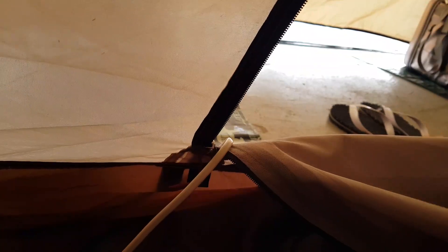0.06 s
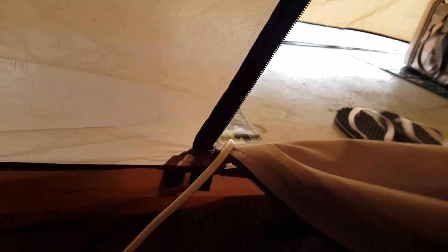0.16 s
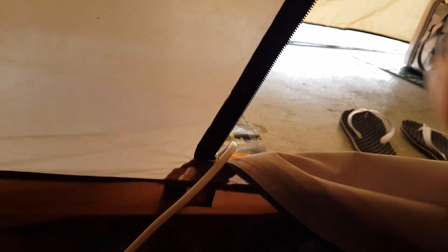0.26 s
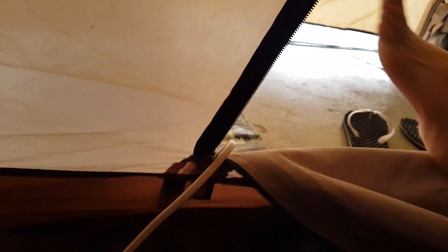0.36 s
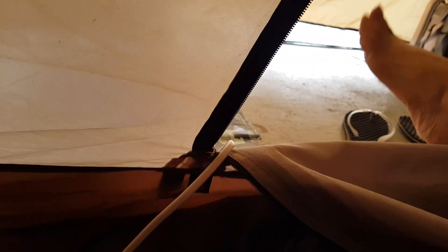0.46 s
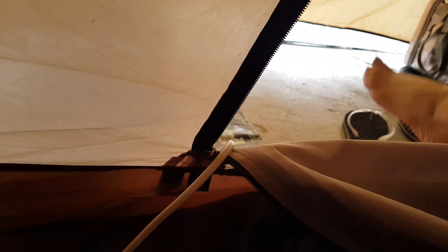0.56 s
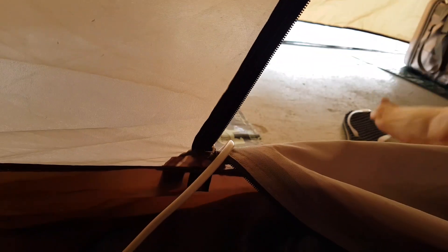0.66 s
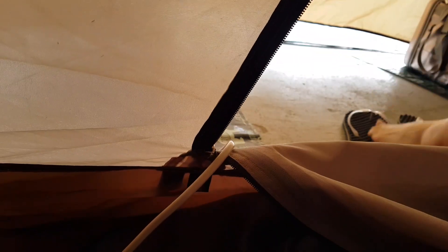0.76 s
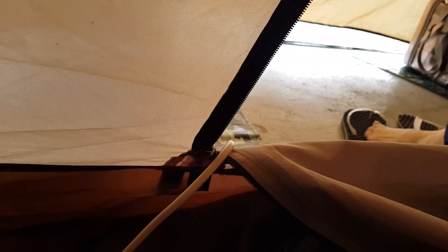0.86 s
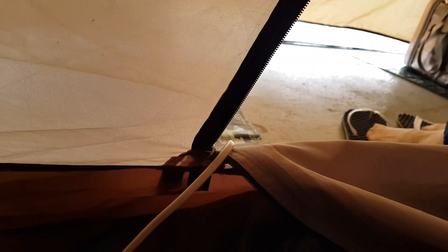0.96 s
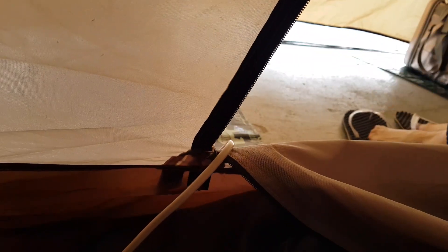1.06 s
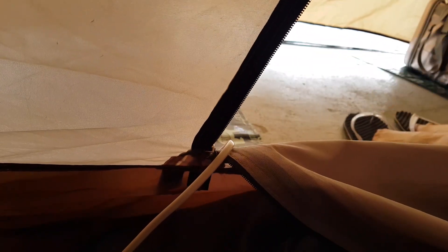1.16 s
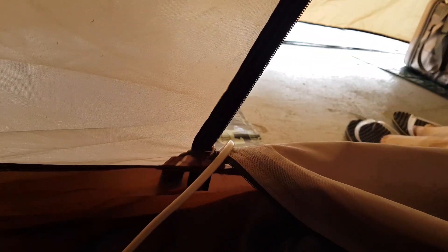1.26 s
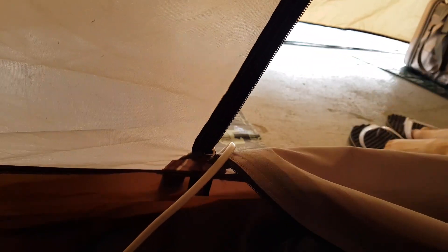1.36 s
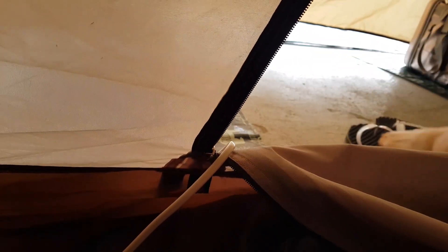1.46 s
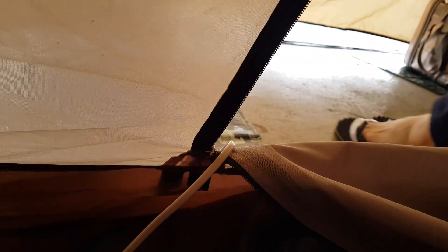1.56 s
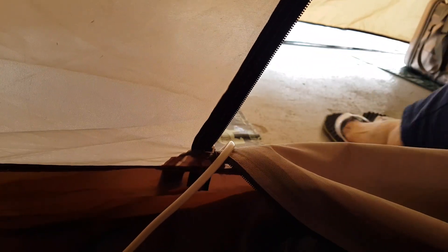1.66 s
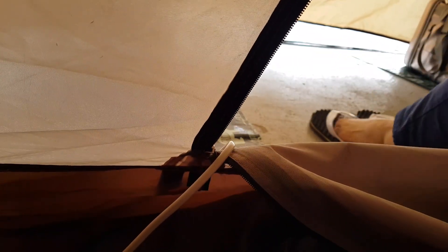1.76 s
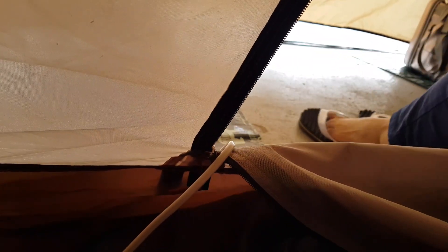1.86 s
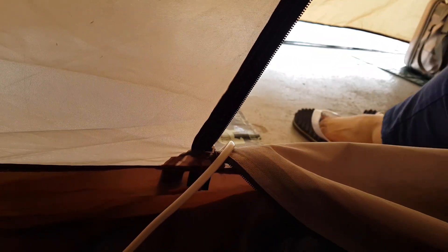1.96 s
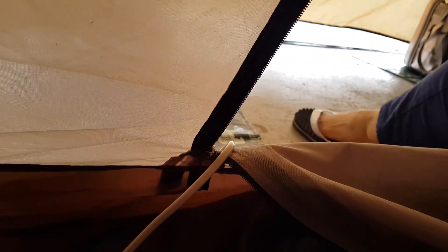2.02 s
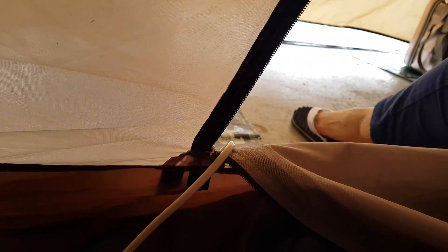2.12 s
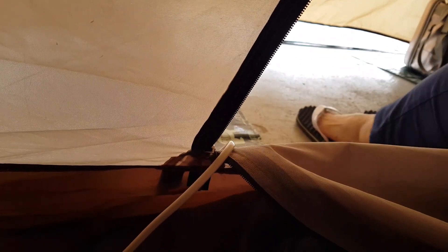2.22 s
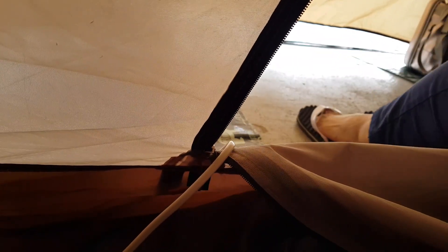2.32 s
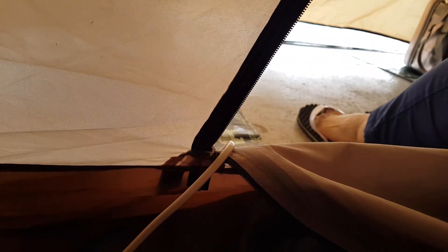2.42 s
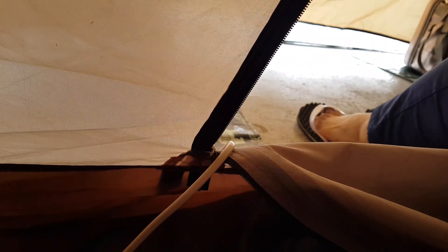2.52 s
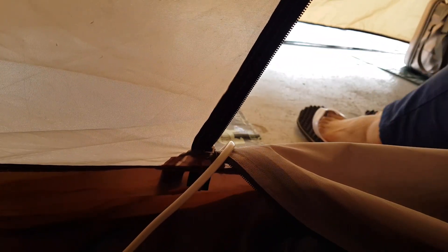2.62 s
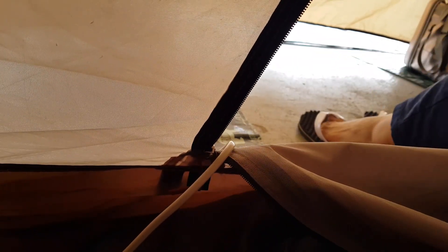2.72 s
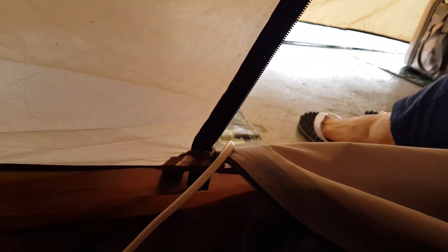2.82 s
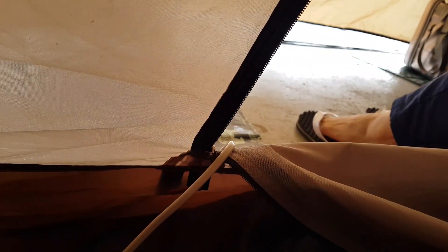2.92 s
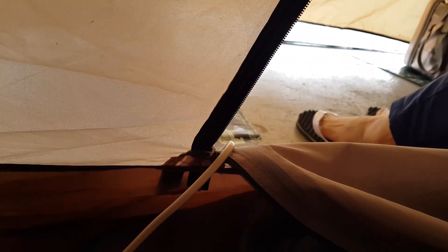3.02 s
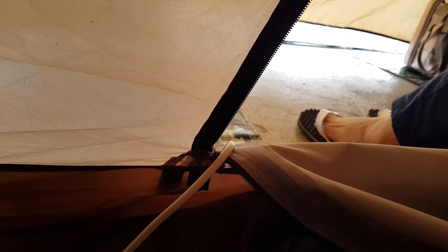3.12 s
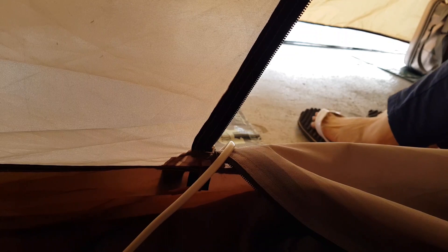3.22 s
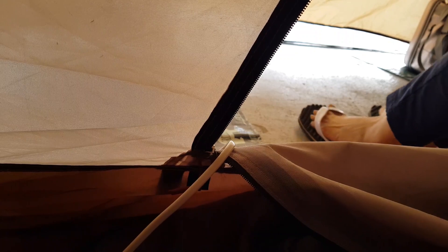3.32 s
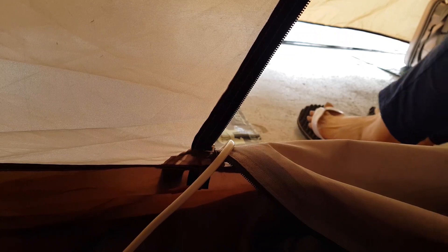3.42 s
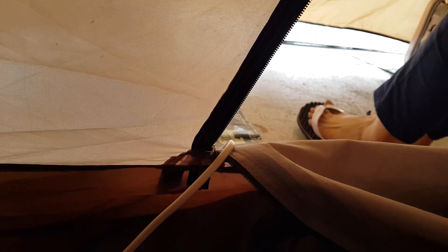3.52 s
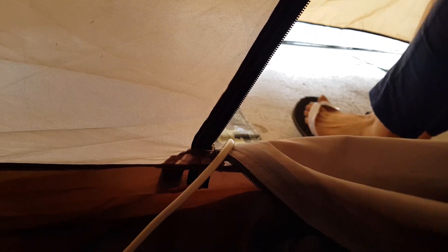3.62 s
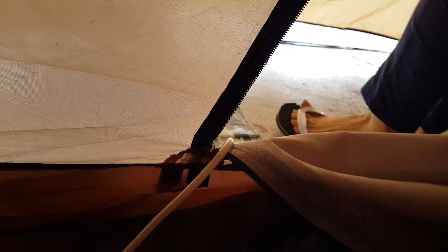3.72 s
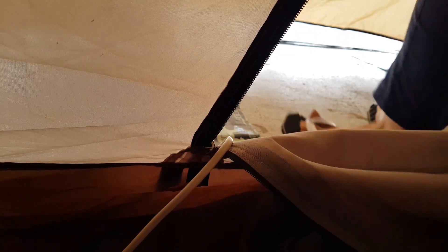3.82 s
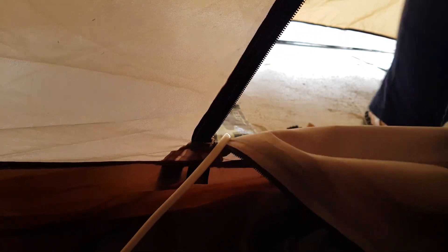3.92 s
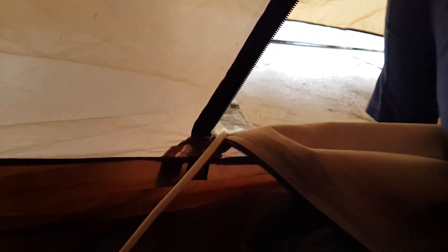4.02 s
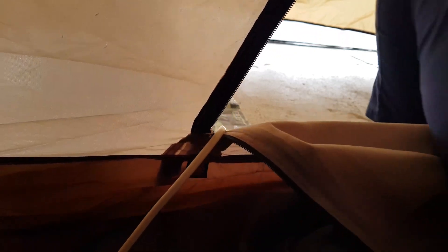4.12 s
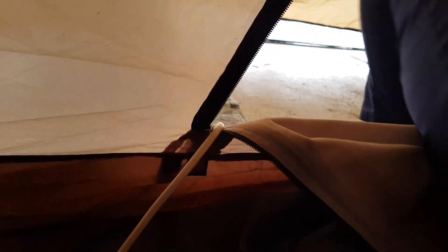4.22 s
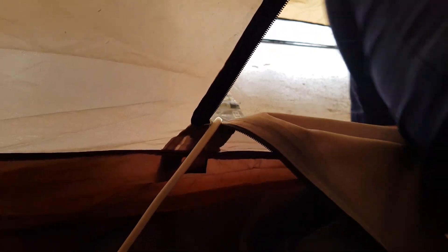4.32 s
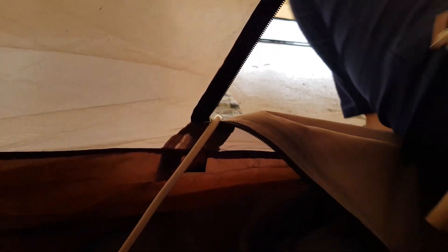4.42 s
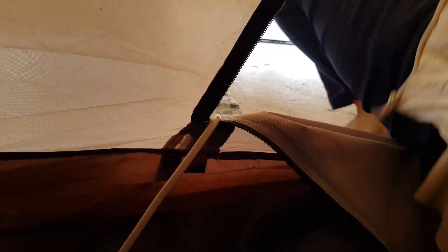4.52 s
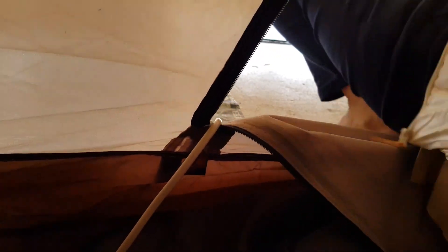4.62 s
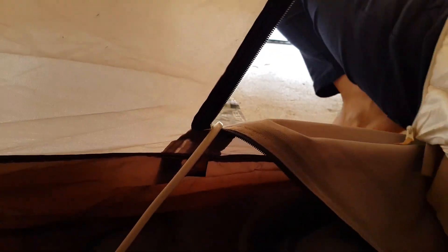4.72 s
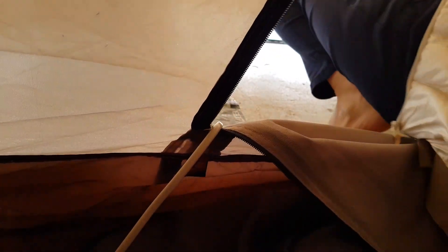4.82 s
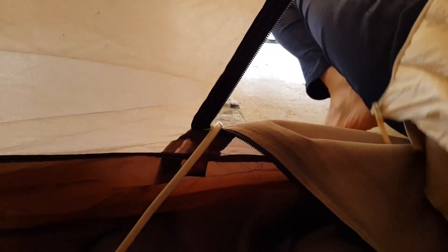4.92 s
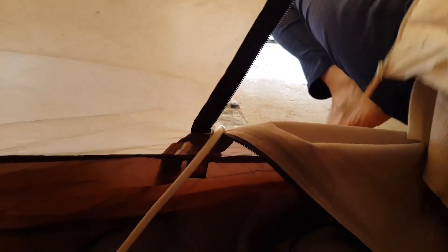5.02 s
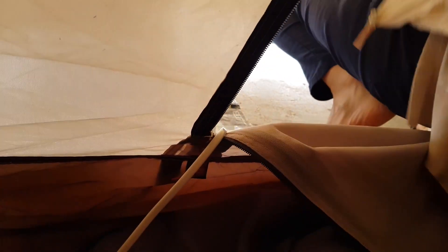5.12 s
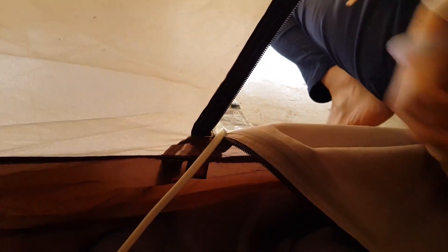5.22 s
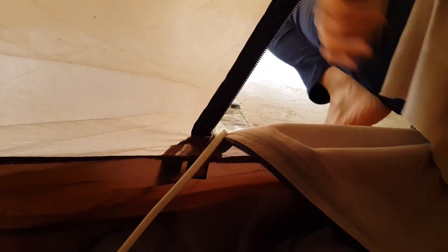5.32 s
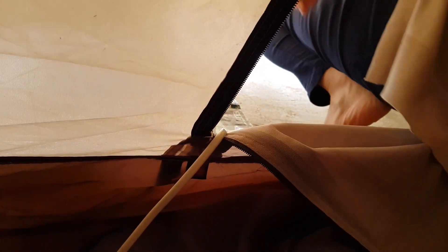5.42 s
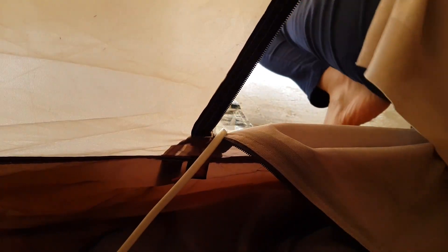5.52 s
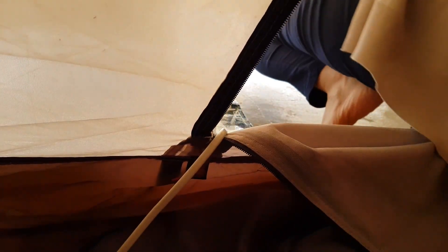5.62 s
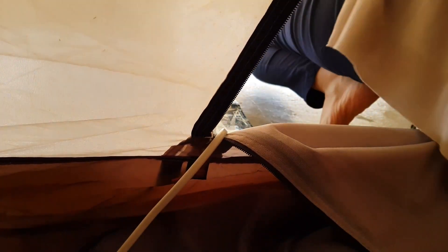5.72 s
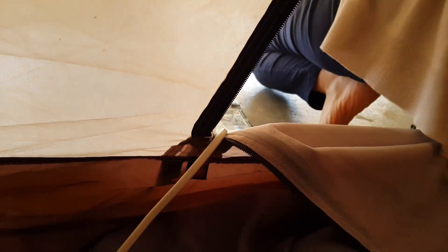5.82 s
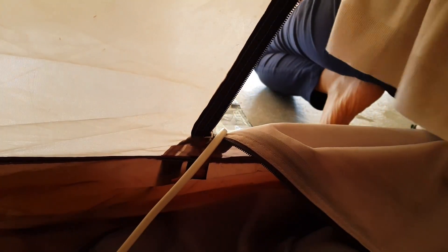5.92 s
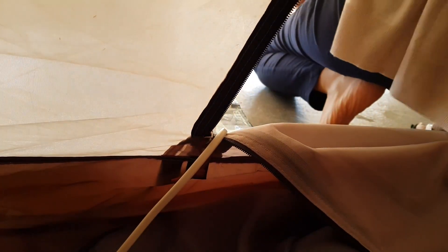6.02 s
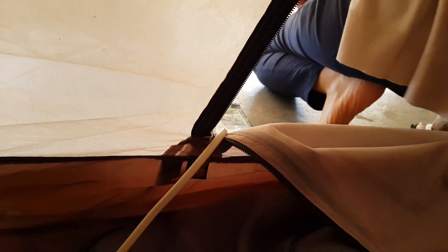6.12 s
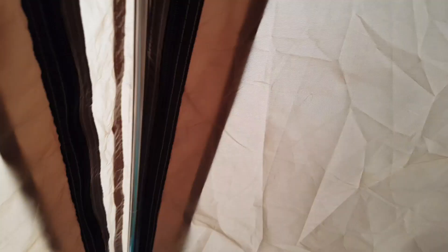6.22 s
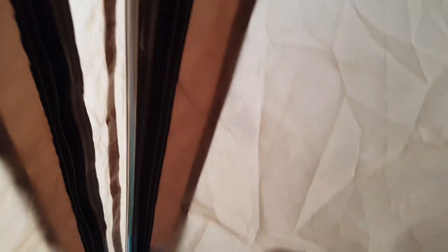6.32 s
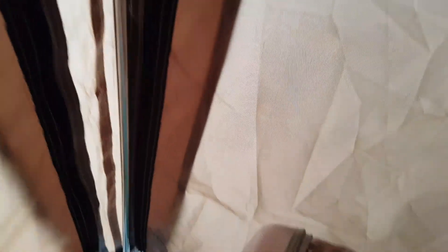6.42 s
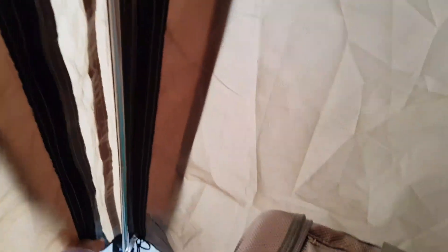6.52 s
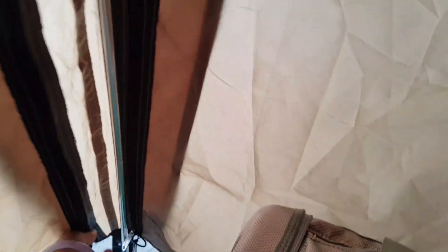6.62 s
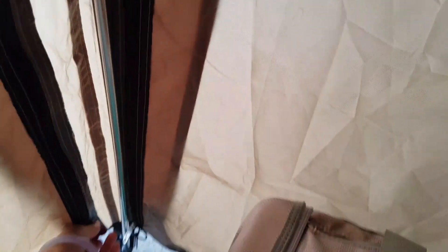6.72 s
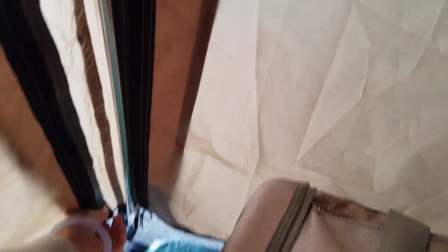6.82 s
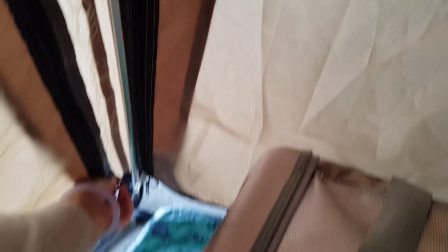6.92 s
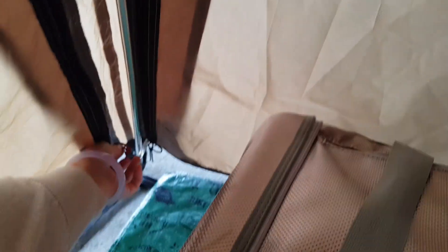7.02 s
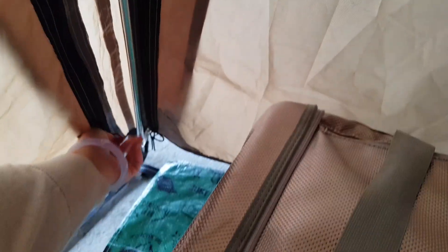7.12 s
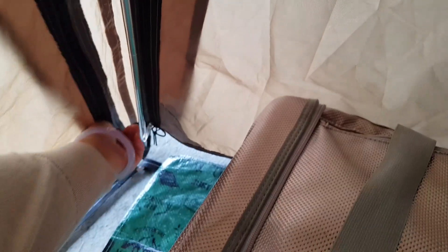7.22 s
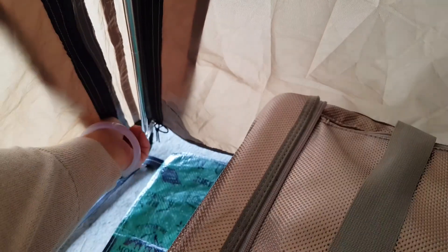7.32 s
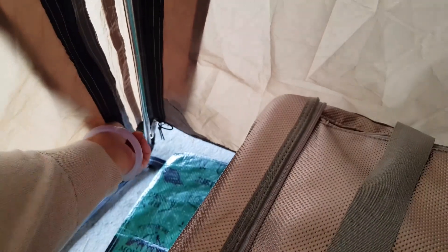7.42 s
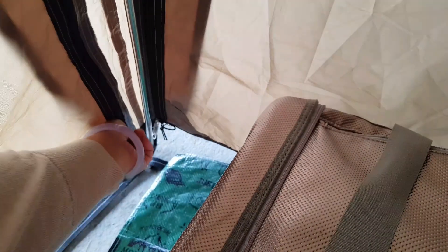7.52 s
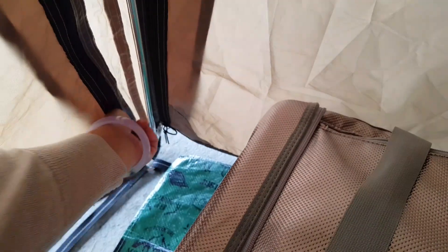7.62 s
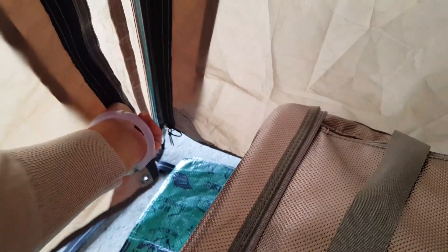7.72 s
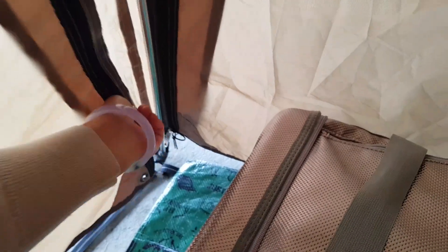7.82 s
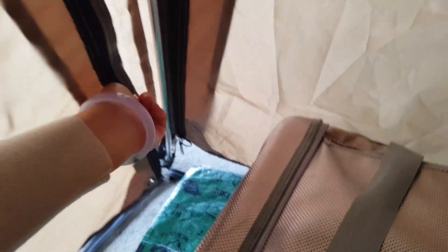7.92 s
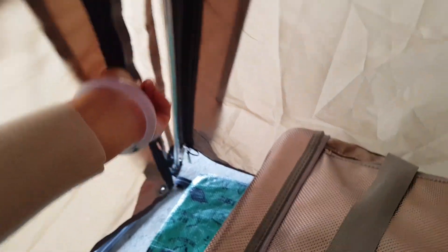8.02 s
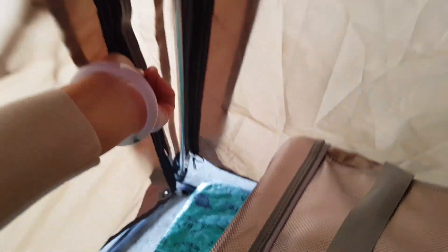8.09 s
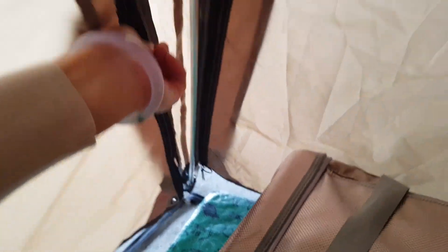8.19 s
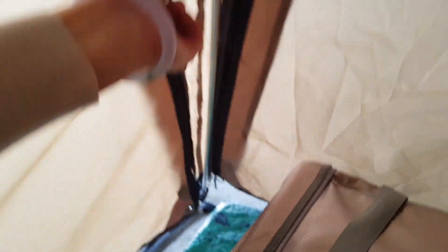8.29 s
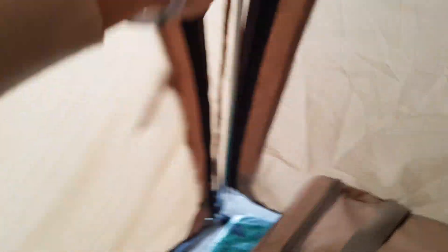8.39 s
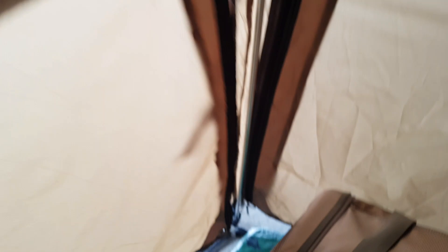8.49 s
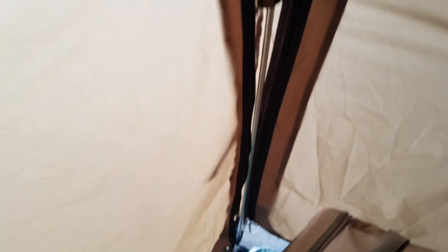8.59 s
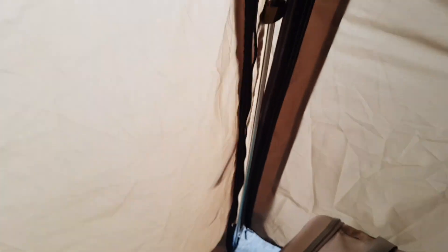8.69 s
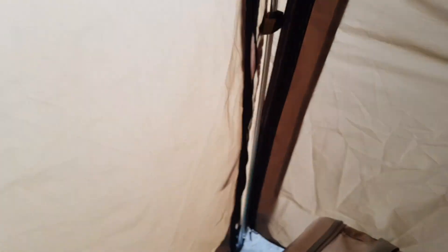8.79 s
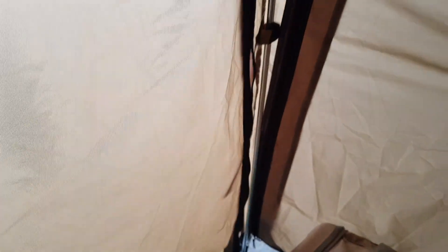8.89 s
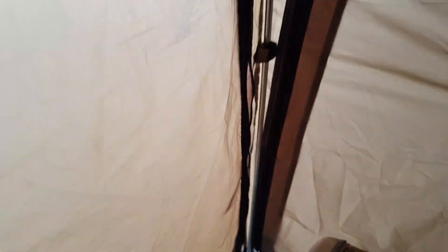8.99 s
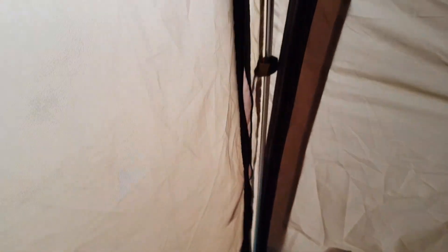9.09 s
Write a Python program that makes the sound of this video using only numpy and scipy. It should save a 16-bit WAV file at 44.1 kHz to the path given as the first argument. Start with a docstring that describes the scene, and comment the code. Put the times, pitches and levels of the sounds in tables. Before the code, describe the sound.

Inside a small tent, nylon rustles and slippers scuff as someone shifts about, then after a quiet pause a long rising zip pull rasps.

```python
"""A tent door zip is pulled in one stroke: teeth sing at their passing rate, friction rasps and hisses, snags burst.
Before it, inside the small tent, someone shuffles into slippers, crouches and rustles the nylon.
Cloth is grainy shaped noise in swells, with crisp flicks and brief pitched rings of filtered noise;
feet, knees and fingers knock on ringing ground modes. A low outdoor rumble and faint hiss lie under everything."""
import sys
import numpy as np
from scipy import signal
from scipy.fft import rfft, irfft, next_fast_len
from scipy.io import wavfile
from scipy.ndimage import uniform_filter1d

SR = 44100
rng = np.random.default_rng(int(sys.argv[2]) if len(sys.argv) > 2 else 0)


def put_to_file(sound):
    """Save the sound as 16-bit audio at rate SR, in the file named by the first command-line argument."""
    columns = np.atleast_2d(sound).T  # one column per channel
    safe = np.clip(columns, -1, 1)
    whole_steps = np.round(safe * 32767)
    wavfile.write(sys.argv[1], SR, whole_steps.astype(np.int16))


N = 403515   # length in samples

# Course of the zip pull; rasp_db follows the hand's pressure, whine_db is over the rasp, the last two trim its multiples:
# time_s, rate_teeth_per_s, rasp_db, whine_db, second_multiple_db, third_and_higher_db
ZIP_PULL = [(7.64, 124, -73, -4, 0, -3), (7.70, 135, -52, -7.5, -3, -11.5), (7.78, 181, -43, -9.5, 3.5, 2),
            (7.86, 208, -41.5, -5, 1.5, -9.5), (7.96, 274, -42, -0.5, -1.5, -1),
            (8.03, 292, -44, 3, -9, -0.5), (8.086, 362, -39.5, -6, 2, 0), (8.19, 415, -38, -1, -7.5, -4.5),
            (8.27, 445, -38.5, -5, 2, 8), (8.32, 500, -39.5, 6.5, -5, -3), (8.365, 572, -41.5, 0.5, 5, 2.5),
            (8.393, 587, -39.5, 4.5, -9, -4.5), (8.412, 590, -40.5, -5, 5.5, 8),
            (8.427, 625, -39.5, -8, 2, 4), (8.46, 665, -41, -0.5, 12.5, 4), (8.51, 696, -39, 4, -7, -0.5),
            (8.586, 778, -38.5, 3.5, -6.5, 0.5), (8.625, 770, -35, -1.5, 7.5, -5),
            (8.70, 785, -38.5, -1, 0.5, -3), (8.72, 755, -37.5, -1.5, 0, 0),
            (8.755, 640, -40.5, -9.5, 14.5, 4.5), (8.79, 585, -40, 2, 7.5, -7),
            (8.83, 512, -41, 2.5, -1.5, -10), (8.9, 468, -41.5, -2.5, 0.5, -1), (8.93, 505, -41, 0, 1, -2),
            (8.985, 465, -41.5, 0.5, -5, -18), (9.02, 382, -41.5, -5, -2.5, 6),
            (9.055, 370, -39, -17, 11, 13.5), (9.072, 422, -43, -0.5, -0.5, -2),
            (9.15, 365, -44.5, 7.5, -7, -5)]
# Where the slider catches and slows: time_s, burst_db, length_s, highest_hz, speed_lost_share
ZIP_SNAGS = [(8.195, -37.5, 0.049, 440, 0.013), (8.4, -43, .048, 1700, 0.35),
             (8.648, -41.5, .036, 713.5, .14), (8.739, -41, 0.061, 407, .011),
             (8.864, -40.5, 0.05, 748, .16), (8.965, -46, .034, 748, .15), (9.107, -38.5, .05, 1110, 0.17)]
# Resonances of the zip tape: pitch_hz, width_hz, level_db
TAPE_MODES = [(390, 200, 2), (824, 165, 3.5), (1000, 190, 3), (1485, 216, 5.5), (2080, 480, 0),
              (3850, 8100, -19.5)]
# What the tape radiates of the tooth rate and its multiples: pitch_hz, level_db (over the rasp)
WHINE_RADIATION = [(120, 5), (210, -5), (290, -2.5), (400, 0), (580, -2.5), (790, 3), (1130, 1),
                   (1500, 0.5), (1750, -3.5), (2050, 3.5), (2600, -2), (3800, -3.5), (6000, -7)]
# Strength of the tooth rate and its next four multiples: level_db
FIRST_MULTIPLES_DB = [2.5, -1, -0.5, -6.5, -4.5]
# Spectrum of the slider's hiss: pitch_hz, level_db
ZIP_HISS = [(1290, -5), (2200, -17), (2470, 2), (3400, -2), (3900, 2.5), (6650, -10.5), (11200, -0.5),
            (15600, -9)]
# How the two microphones hear the zip: pitch_hz, likeness_0_to_1, right_leads_rad, left_minus_right_db
ZIP_STEREO = [(110, 0.96, 0, -1), (500, 0.95, 0.07, 0), (706, 1, 0.53, -3), (1000, 0.87, 0.85, -2),
              (1400, 0.82, -1.4, -5), (1840, 0.65, -1.4, -6.5), (2400, .4, -2.5, -1.5),
              (3350, 0.17, -2.5, 0.5), (7700, .05, -3.5, -2.5), (12000, .15, -4.5, 1.7)]

# Strokes of cloth and soles on the groundsheet, rise and fall over 20 dB: peak_s, rubbing_db, rise_s, fall_s
CLOTH_STROKES = [(.19, -38, 0.087, 0.11), (.33, -36.5, 0.31, 0.25), (.552, -46.5, 0.06, 0.22),
                 (.76, -53.5, 0.25, 0.15), (1.011, -50, 0.059, 0.089), (1.075, -47, 0.028, 0.04),
                 (1.221, -40.5, 0.052, 0.09), (1.36, -45, 0.33, 0.58), (1.52, -38, 0.4, 0.29),
                 (1.891, -41.5, 0.21, 0.13), (2.05, -43, 0.1, 0.14), (2.31, -53, 0.27, 0.085),
                 (2.439, -51.5, 0.43, 0.11), (2.56, -51.5, 0.065, 0.14), (2.76, -44, 0.2, 0.23),
                 (2.88, -49.5, 0.2, 0.072), (3.05, -48.5, 0.098, 0.32), (3.2, -47, 0.4, 0.31),
                 (3.6, -54.5, 0.39, 0.74), (3.85, -50.5, 0.33, 0.81), (4.02, -37.5, 0.1, 0.14),
                 (4.147, -37.5, 0.036, 0.25), (4.289, -37, 0.049, 0.038), (4.5, -52, 0.42, 1),
                 (5.15, -54.5, 0.19, 0.27), (5.48, -59.5, 0.95, 0.95), (5.881, -57.5, 0.067, 0.23),
                 (6.04, -59, 0.22, 0.16), (6.51, -59.5, 0.066, 0.36), (6.8, -63, 0.78, 0.34),
                 (7.33, -68.5, 0.3, 1)]
# Heavier scuffs, rise and fall over 20 dB: peak_s, dull_db, hollow_db, rise_s, fall_s
SCUFFS = [(0.05, -53, -55, 0.028, 0.11), (.3, -53.5, -50.5, 0.22, 0.27), (.39, -50.5, -50.5, 0.18, 0.24),
          (1.022, -60.5, -57, 0.062, 0.061), (1.52, -53, -48, 0.13, 0.32), (1.78, -59.5, -52, 0.84, 0.57),
          (2.06, -84, -68, 0.08, 0.079), (2.4, -65.5, -75, 0.08, 0.3), (2.865, -63, -72, 0.041, 0.03),
          (3.17, -62, -57.5, 0.18, 0.44), (3.55, -59, -62, 0.081, .3), (3.62, -54, -66, 0.062, 0.089),
          (3.88, -66, -62.5, 0.62, 0.41), (4.033, -36, -39, 0.052, 0.096), (4.27, -54, -49.5, 0.11, 0.075),
          (4.48, -61, -59, 0.5, 0.45), (5.17, -57.5, -59.5, 0.16, 0.11), (6.02, -69.5, -67, 0.35, 0.17),
          (6.53, -72, -65.5, 0.063, 0.19), (6.8, -70.5, -77, 0.53, 0.42)]
# Spectrum of rubbing nylon: pitch_hz, level_db (per Hz)
RUB_SPECTRUM = [(710, -22.5), (1200, -14), (1460, -18), (1860, -9), (2170, -5), (3120, -4), (3950, -4.5),
                (4950, -5), (7130, -14.5), (9730, -10), (11800, -11), (15600, -17.5)]
# Spectrum of a scuff's dull thud: pitch_hz, level_db
DULL_SPECTRUM = [(88, -12), (150, -0.5), (561, 0.5), (687, 3.5), (750, 2.5), (980, -15), (1650, -120)]
# Spectrum of a slipper's hollow ring: pitch_hz, level_db
HOLLOW_SPECTRUM = [(450, -23), (700, -6), (950, 0.5), (1150, -1.5), (1450, -5.5), (1950, 0), (2600, -48)]
# Crisp flicks of nylon, rise and fall over 20 dB; brightness is the lift above 7 kHz:
# peak_s, level_db, brightness_db, rise_s, fall_s
NYLON_FLICKS = [(0.042, -45, -4, .002, 0.045), (1.2, -42, 1, .006, 0.12), (3.26, -39, 2, .002, 0.029),
                (4.136, -40, 4, 0.021, 0.053), (5.172, -59, 0, 0.0088, 0.028),
                (6.386, -60.5, 2, .005, 0.13), (6.702, -60.5, 18, 0.014, 0.0092),
                (6.772, -63.5, 15.5, 0.04, 0.023), (6.84, -60, 16.5, 0.028, 0.018),
                (6.887, -58, 12.5, 0.0078, 0.035)]
# A rubbing fold or sole briefly rings at one pitch: peak_s, pitch_hz, level_db, rise_s, fall_s
CLOTH_RINGS = [(.165, 3000, -45, 0.024, .05), (.27, 3050, -45, .03, .06), (.32, 4700, -45, 0.11, .12),
               (.32, 1060, -49, 0.083, 0.035), (1.85, 1920, -50, .15, 0.15), (1.89, 1014, -52, 0.26, 0.056),
               (2.05, 2100, -52.5, 0.1, 0.12), (2.345, 2310, -58, 0.036, .07),
               (2.07, 1010, -60, 0.1, 0.084), (4.255, 419, -51.5, .05, 0.03),
               (2.76, 2220, -49, 0.088, 0.13), (3.975, 2080, -39.5, 0.024, 0.089),
               (4.2, 3300, -43, .04, 0.083)]
# Soft knocks of feet, knees and fingers: time_s, contact_db, push_db, hardness_db_per_octave
SOFT_KNOCKS = [(2.864, -56.5, -61, -9), (3.617, -71, -48, -2), (4.005, -59, -53, 10), (4.257, -53, -60, -3),
               (5.165, -48.5, -46, 0), (5.175, -50, -33.5, -2), (7.285, -60.5, -81, -2),
               (7.699, -93, -38.5, 0)]
# Modes of the ground: pitch_hz, level_db, t60_s
GROUND_MODES = [(263, 12.5, 0.013), (394, -3, 0.019), (756, 1, 0.011), (1220, 3, 0.0088), (2210, 2, 0.014)]
# How the two microphones hear cloth and air: pitch_hz, likeness_0_to_1, right_leads_rad, left_minus_right_db
CLOTH_STEREO = [(70, 0.96, 0, -1), (280, 0.75, 0.34, -2), (497, 0.77, 0.63, 4), (710, 0.63, 1.86, 1),
                (1010, 0.53, 1.5, -2.5), (1400, 0.4, 2.5, -4), (1870, 0.33, 1.53, -1.5), (3350, 0, 1.06, 2),
                (7500, 0, 0.7, -5), (11700, .02, .9, 0.5)]
# Spectrum of the outdoor rumble: pitch_hz, level_db
RUMBLE_SPECTRUM = [(20, -24), (34, -7.5), (64, 1.5), (81, -3), (114, -8.5), (161, -18), (280, -31.5),
                   (500, -54), (1100, -120)]
# Spectrum of the faint steady hiss: pitch_hz, level_db
AIR_SPECTRUM = [(120, -5.5), (310, -8.5), (743, -15), (3440, -21.5), (4950, -13), (7390, -28),
                (11400, -8.5), (15600, -12.5)]

SIXTH_MULTIPLE_DB, HIGHER_STEP_DB = -9.5, -1.5   # the sixth multiple, then the change for each further one
HISS_DB, HISS_DB_PER_OCTAVE = -38, 6.5   # at 450 teeth per s and a rasp of -40 dB; a faster slider hisses more
HISS_FOLLOWS = 0.51   # share of the rasp's swing in dB
SHAKE_DB = -9.5   # relative to the rasp
SNAG_OCTAVES = 2.4   # width of a burst
SNAG_SQUARENESS = 1.7   # of the dip in speed: 1 pointed, 2 round
SWELL_ROUNDNESS = 1.11   # 1 pointed, 2 round
RUB_STILL_DB, DULL_STILL_DB, HOLLOW_STILL_DB = -92, -91, -87   # cloth at rest
BRIGHT_DB, DULLS_PER_DB = 5.5, 0.0211   # treble lift at a rubbing level of -50 dB; harder rubbing is duller
RING_SHARPNESS = 10   # pitch over width
PUSH_HZ, PUSH_T60_S, PUSH_LEAN_DB = 53, 0.25, 7.5   # lean is left minus right
RUMBLE_DB, AIR_DB = -55.5, -67
CUTOFF_HZ = 15800


def amp(db):
    """Decibels to gain."""
    return 10 ** (np.asarray(db) / 20)


def rms_one(x):
    """Scale to rms 1."""
    return x / np.sqrt(np.mean(x ** 2) + 1e-20)


def in_time(rows, start=0):
    """Columns of a table, one value per sample from sample start on."""
    s, *columns = np.transpose(rows)
    return [np.interp(np.arange(start, N) / SR, s, c) for c in columns]


def at_hz(points, hz):
    """Read a spectrum on a log frequency axis."""
    points = np.array(points)
    return np.interp(np.log(np.maximum(hz, 1)), np.log(points[:, 0]), points[:, 1])


def bin_hz(size):
    """Frequencies of the spectrum bins."""
    return np.arange(size // 2 + 1) * SR / size


def band(x, edges_hz, kind):
    """Second-order Butterworth filter."""
    return signal.sosfilt(signal.butter(2, edges_hz, kind, fs=SR, output="sos"), x)


def drift(rate_hz, size=N):
    """Slow random wander of spread 1, drawn every 40 samples and joined by lines."""
    r = np.exp(-80 * np.pi * rate_hz / SR)
    steps = rng.standard_normal(size // 40 + 2002)
    slow = signal.lfilter([1], [1, -2 * r, r * r], steps)[2000:]   # skip the filter's run-in
    return np.interp(np.arange(size) / 40, np.arange(len(slow)), rms_one(slow))


def ring(clicks, hz, t60_s):
    """A unit click sets a decaying sine of height 1 ringing."""
    r = amp(-60 / (t60_s * SR))
    w = 2 * np.pi * hz / SR
    return signal.lfilter([0, np.sin(w)], [1, -2 * r * np.cos(w), r * r], clicks + 1e-18)


def colour(x, spectrum):
    """Shape the spectrum of each row."""
    size = next_fast_len(x.shape[-1])
    shaped = rfft(x, size) * amp(at_hz(spectrum, bin_hz(size)))
    return irfft(shaped, size)[..., :x.shape[-1]]


def spread(near, other, stereo):
    """Two channels from a sound and an unrelated one; likeness, lead and balance depend on frequency."""
    size = next_fast_len(len(near))
    hz, *columns = np.transpose(stereo)
    alike, lead, lean_db = (at_hz(np.transpose([hz, c]), bin_hz(size)) for c in columns)
    alike = np.clip(alike, 0, 1)
    near = rfft(near, size)
    left = near * np.exp(-.5j * lead)
    right = alike * near * np.exp(.5j * lead) + np.sqrt(1 - alike ** 2) * rfft(other, size)
    return irfft([left * amp(lean_db / 2), right * amp(-lean_db / 2)], size)[:, :len(other)]


def grains(spectrum, grit_db, patchy_db, patch_rate, size=N):
    """Two unrelated streams of tiny fibre slips; bands an octave apart flicker on their own."""
    grit = uniform_filter1d(np.minimum(rng.exponential(1, size), 3.0), size=9)
    slips = rng.standard_normal((2, size)) * amp(grit_db * grit)
    rest = rms_one(colour(slips, spectrum))
    out = 0
    edges = 55 * 2 ** np.arange(8)
    for hz in edges[(edges > spectrum[1][0]) & (edges < spectrum[-2][0])]:
        low = band(rest, hz, "low")
        out = out + low * amp(patchy_db * drift(patch_rate, size))
        rest = rest - low
    return rms_one(out + rest * amp(patchy_db * drift(patch_rate, size)))


def swells(peak_s, peak_db, rise_s, fall_s, still_db):
    """Level in dB of overlapping swells that add in power."""
    power = np.full(N, amp(2 * still_db))
    for s, db, rise, fall in zip(peak_s, peak_db, rise_s, fall_s):
        at = np.arange(max(int((s - 3 * rise) * SR), 0), min(int((s + 3 * fall) * SR), N))
        t = at / SR - s
        drop_db = 20 * np.where(t < 0, -t / rise, t / fall) ** SWELL_ROUNDNESS
        power[at] += amp(2 * (db - drop_db))
    return 10 * np.log10(power)


def zip_pull():
    """The teeth sing at their passing rate and its multiples; friction rasps and hisses in step with them."""
    start = int(ZIP_PULL[0][0] * SR)
    size = N - start
    rate, rasp_db, whine_db, second_db, higher_db = in_time(ZIP_PULL, start)
    hiss_db = HISS_DB + HISS_DB_PER_OCTAVE * np.log2(rate / 450) + HISS_FOLLOWS * (rasp_db + 40)
    bursts, speed = (part[..., start:] for part in zip_snags())
    rate = rate * speed * (1 + .012 * drift(60, size))
    teeth = np.cumsum(rate) / SR   # teeth passed so far
    # uneven seating blurs the high multiples most
    teeth = teeth + (.009 + .12 * (1 - speed)) * drift(150, size)

    song = 0
    multiples_db = FIRST_MULTIPLES_DB + [SIXTH_MULTIPLE_DB + HIGHER_STEP_DB * k for k in range(7)]
    for k, db in enumerate(multiples_db):
        tone_db = rasp_db + whine_db + db + at_hz(WHINE_RADIATION, (k + 1) * rate)
        tone_db = tone_db + (k == 1) * second_db + (k > 1) * higher_db
        waver_db = (3 + .35 * k) * drift(22, size)
        song = song + np.sqrt(2) * amp(tone_db + waver_db) * np.sin(2 * np.pi * (k + 1) * teeth)
    # the tent walls send the tone back late
    echo = np.pad(song, (round(.0047 * SR), 0))[:size]

    contact = 0.45 + np.exp(-3.5 * (teeth % 1))   # friction is strongest as a tooth seats
    rasp = rms_one(zip_tape(contact * rng.standard_normal((2, size)))) * amp(1.1 * drift(30, size))
    # the pull shakes the tent wall
    shake = rms_one(band(rng.standard_normal((2, size)), [45, 260], "band"))
    hiss = grains(ZIP_HISS, grit_db=0.5, patchy_db=1.0, patch_rate=11, size=size) * contact
    friction = amp(rasp_db) * (rasp + amp(SHAKE_DB) * shake) + amp(hiss_db) * hiss
    paths = friction + np.array([song, echo]) + bursts
    fade_in = np.minimum(np.arange(size) / (0.03 * SR), 1)
    stereo = spread(*(paths * fade_in), ZIP_STEREO)
    return np.pad(stereo, ((0, 0), (start, 0)))


def zip_tape(x):
    """Resonances of the zip tape and the cloth sewn to it, signs alternating."""
    out = 0
    for k, (hz, width, db) in enumerate(TAPE_MODES):
        r = np.exp(-np.pi * width / SR)
        mode = signal.lfilter([1 - r, 0, r - 1], [1, -2 * r * np.cos(2 * np.pi * hz / SR), r * r], x)
        out = out + (-1) ** k * amp(db) * mode
    return out


def zip_snags():
    """Rough bursts where the slider sticks and tears free, and the share of speed that is left."""
    size = 4410   # 0.1 s around each snag
    out, speed = np.zeros((2, N + size)), np.ones(N + size)
    t = np.arange(size) / SR - .05
    for s, db, length, high_hz, lost in ZIP_SNAGS:
        noise = rng.standard_normal((2, size))
        burst = rms_one(band(noise, [high_hz / 2 ** SNAG_OCTAVES, high_hz], "band"))
        i = int((s + t[0]) * SR)
        out[:, i:i + size] += amp(db) * burst * np.exp(-(2 * t / length) ** 4)
        speed[i:i + size] -= lost * np.exp(-np.abs(2 * t / length) ** SNAG_SQUARENESS)
    return out[:, :N], speed[:N]


def rustle():
    """Rubbing nylon hisses, mostly above 1.5 kHz; heavier scuffs add a dull thud and a slipper's hollow ring."""
    rub_db = swells(*np.transpose(CLOTH_STROKES), RUB_STILL_DB)
    s, dull_db, hollow_db, rise, fall = np.transpose(SCUFFS)
    dull_db = swells(s, dull_db, rise, fall, DULL_STILL_DB)
    hollow_db = swells(s, hollow_db, rise, fall, HOLLOW_STILL_DB)
    bright_db = BRIGHT_DB - DULLS_PER_DB * (rub_db + 50)
    rub = grains(RUB_SPECTRUM, grit_db=3.5, patchy_db=1.5, patch_rate=12.2)
    rub = rub + band(rub, 6150, "high") * (amp(bright_db) - 1)
    dull = grains(DULL_SPECTRUM, grit_db=5.0, patchy_db=3.5, patch_rate=9.2)
    hollow = grains(HOLLOW_SPECTRUM, grit_db=3.5, patchy_db=2.5, patch_rate=19)
    return amp(rub_db) * rub + amp(dull_db) * dull + amp(hollow_db) * hollow


def flicks():
    """Each flick of nylon is a short swell of grainy noise with its own brightness."""
    noise = grains(RUB_SPECTRUM, grit_db=4, patchy_db=1, patch_rate=20)
    top = band(noise, 7000, "high")
    s, db, bright_db, rise, fall = np.transpose(NYLON_FLICKS)
    body_gain = amp(swells(s, db, rise, fall, -140))
    top_gain = amp(swells(s, db + bright_db, rise, fall, -140))
    return body_gain * (noise - top) + top_gain * top


def cloth_rings():
    """Friction noise through one narrow resonance per event."""
    out, noise = np.zeros((2, N)), rng.standard_normal((2, N))
    for s, hz, db, rise, fall in CLOTH_RINGS:
        part = slice(max(int(s * SR) - SR // 2, 0), int(s * SR) + SR // 2)   # half a second each side
        r = np.exp(-np.pi * hz / RING_SHARPNESS / SR)
        tone = signal.lfilter([1, 0, -1], [1, -2 * r * np.cos(2 * np.pi * hz / SR), r * r], noise[:, part])
        out[:, part] += rms_one(tone) * amp(swells([s], [db], [rise], [fall], -140)[part])
    return out


def knocks():
    """A soft contact rings the ground modes and pushes the tent air."""
    s, contact_db, push_db, hard_db = np.transpose(SOFT_KNOCKS)
    at = (s * SR).astype(int)
    luck_db = rng.normal(0, 1.3, (len(at), len(GROUND_MODES)))
    ground = 0
    for k, (hz, mode_db, t60_s) in enumerate(GROUND_MODES):
        clicks = np.zeros(N)
        clicks[at] = amp(contact_db + mode_db + hard_db * np.log2(hz / 400) + luck_db[:, k])
        ground = ground + ring(clicks, hz, t60_s)
    pushes = np.zeros(N)
    pushes[at] = amp(push_db)
    lean = amp([[PUSH_LEAN_DB / 2], [-PUSH_LEAN_DB / 2]])
    return ground + ring(pushes, PUSH_HZ, PUSH_T60_S) * lean


def outdoors():
    """A lumpy low rumble and a faint steady hiss, both shaped noise."""
    rumble = grains(RUMBLE_SPECTRUM, grit_db=-4.0, patchy_db=3.5, patch_rate=2.0)
    air = rms_one(colour(rng.standard_normal((2, N)), AIR_SPECTRUM))
    return amp(RUMBLE_DB) * rumble + amp(AIR_DB) * air


def scene():
    """All sources at the two microphones."""
    cloth_and_air = rustle() + flicks() + cloth_rings() + outdoors()
    return zip_pull() + spread(*cloth_and_air, CLOTH_STEREO) + knocks()


def record(dry):
    """The microphone loses the deepest bass; the top is cut steeply."""
    firm = band(dry, 33, "high")
    return signal.sosfilt(signal.ellip(12, .5, 80, CUTOFF_HZ, fs=SR, output="sos"), firm)


dry = scene()
out = record(dry)
put_to_file(out)
```